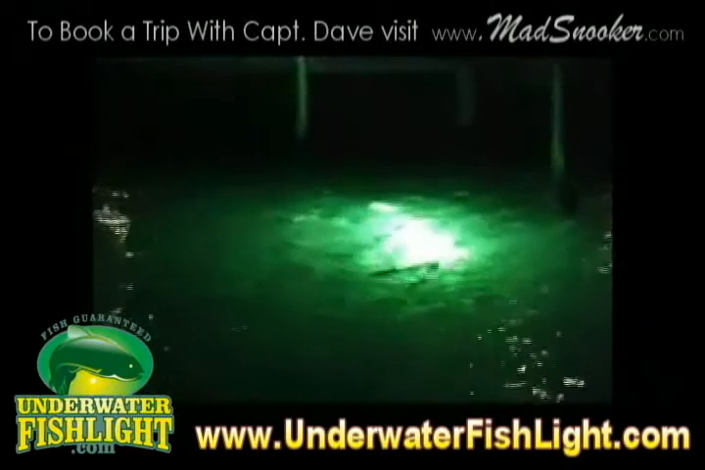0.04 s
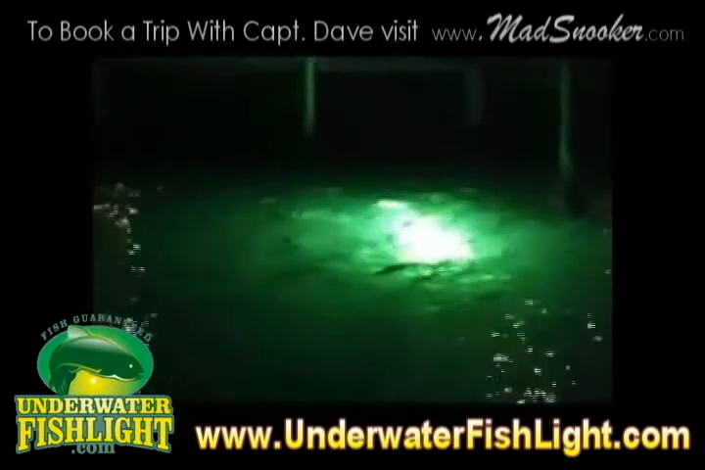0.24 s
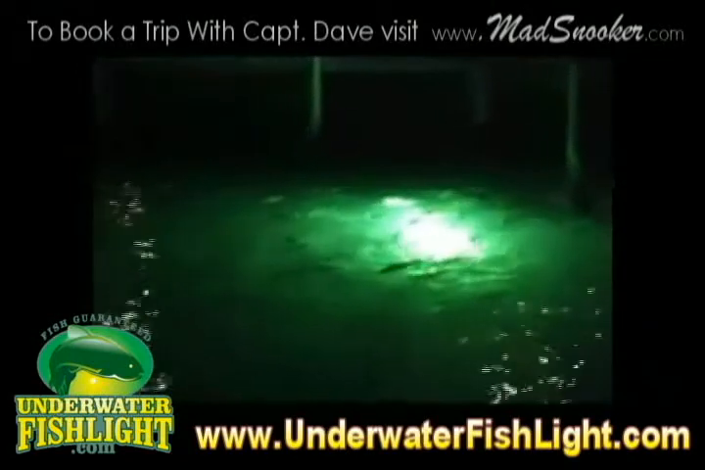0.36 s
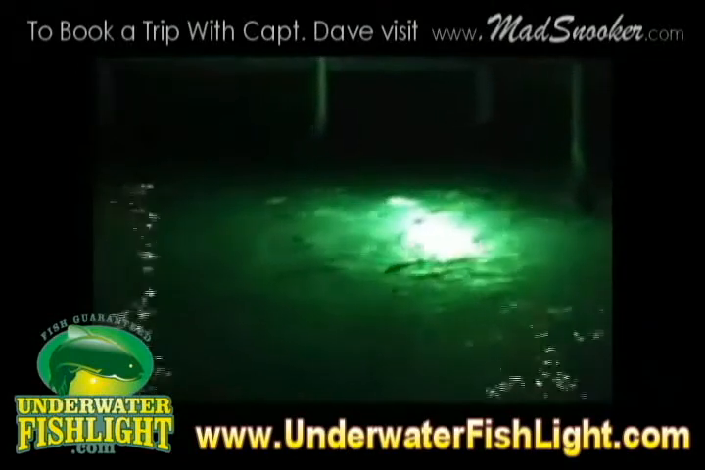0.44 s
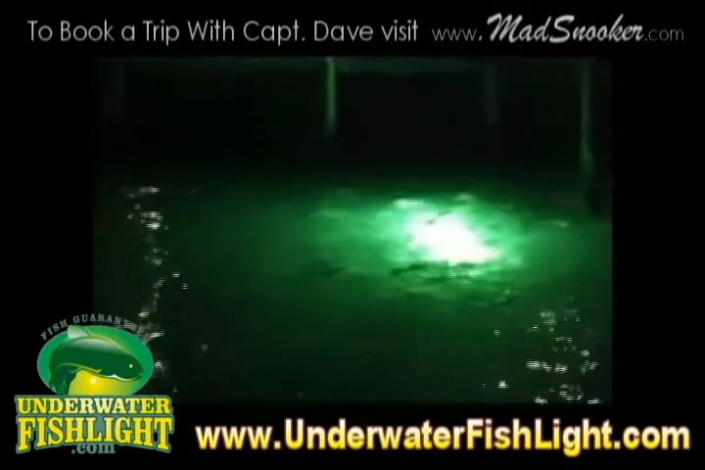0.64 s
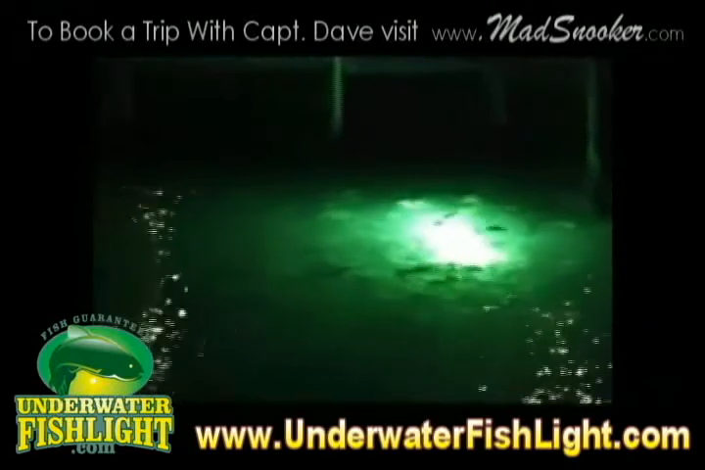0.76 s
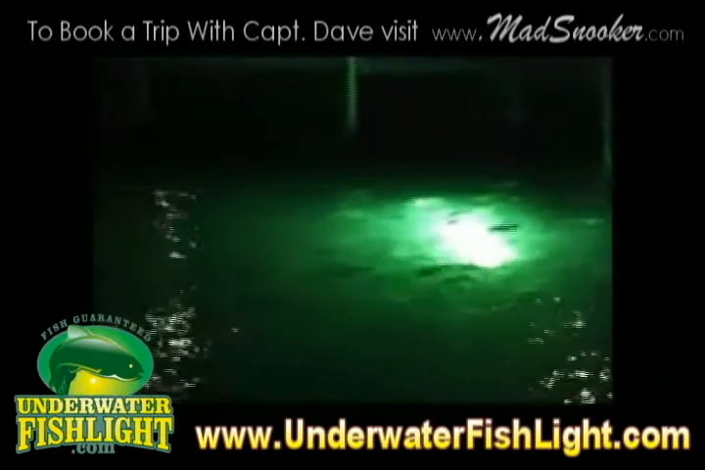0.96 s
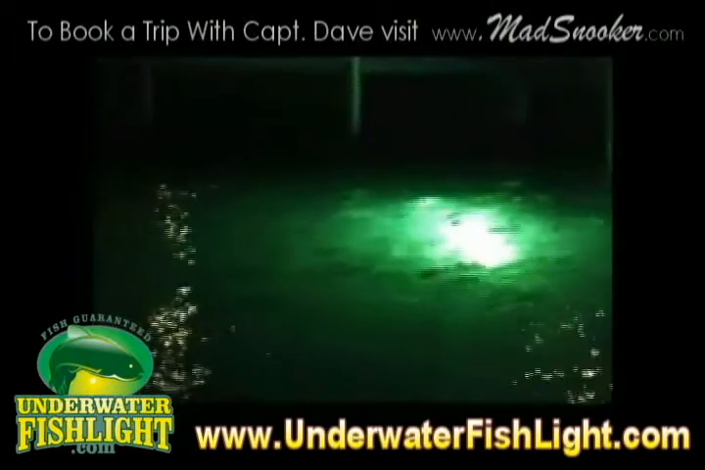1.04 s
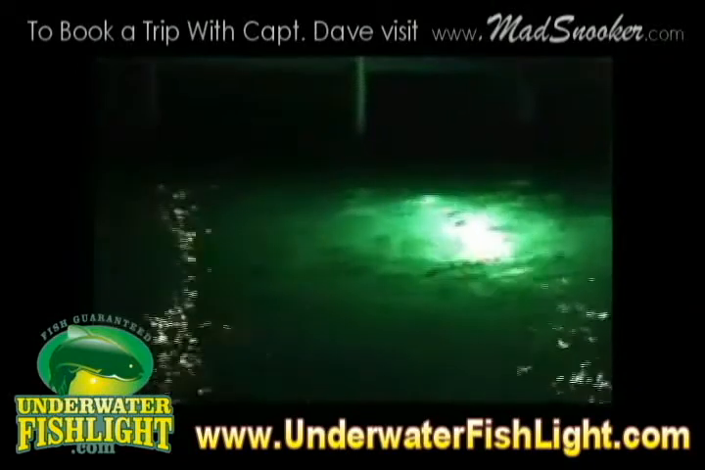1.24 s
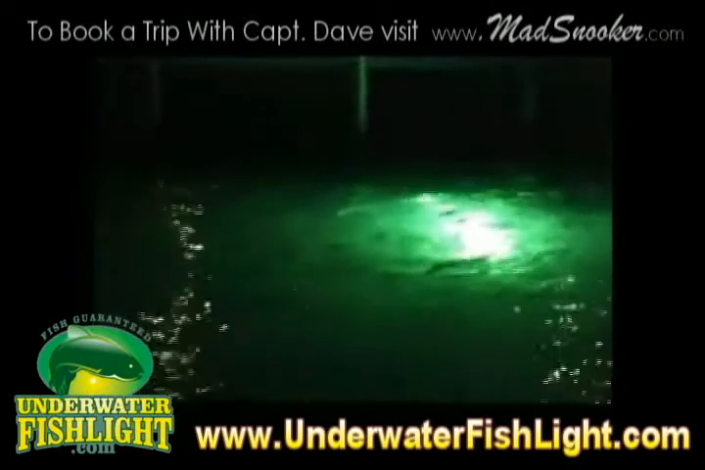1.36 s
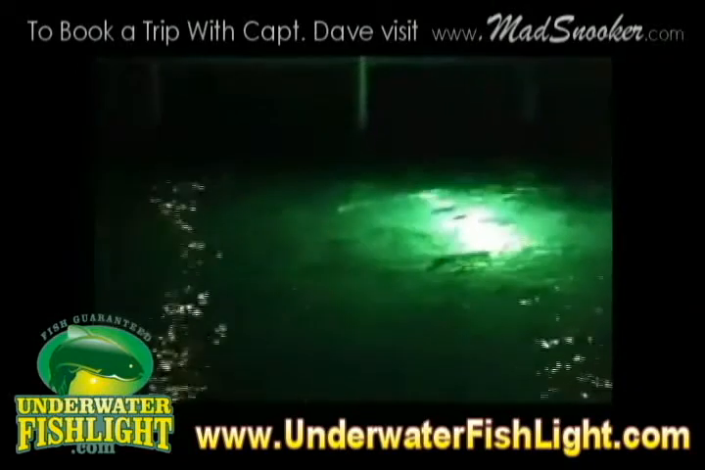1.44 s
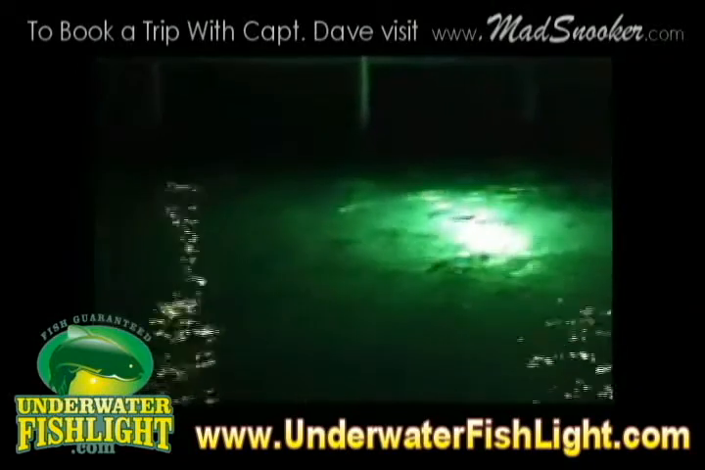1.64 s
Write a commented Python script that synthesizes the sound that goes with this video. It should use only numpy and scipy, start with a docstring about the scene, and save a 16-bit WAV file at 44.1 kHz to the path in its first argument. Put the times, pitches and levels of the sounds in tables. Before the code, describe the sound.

A hard object lands with a sharp double knock over gently lapping water.

```python
"""Two sharp knocks close by on a dock at night: a hard object lands and drops back.
Each blow cracks, rings the object's modes, chatters briefly and echoes off the dock.
Small waves lap and splash as clouds of droplet impacts; trapped air rings in a few plops.
Behind them: a soft wash of water, puffs of breeze and a thin, swelling insect-like buzz."""
import sys
import numpy as np
from scipy import signal
from scipy.fft import rfft, irfft
from scipy.io import wavfile
from scipy.ndimage import uniform_filter1d

SR = 44100
rng = np.random.default_rng(int(sys.argv[2]) if len(sys.argv) > 2 else 0)


def store_wav(level_fs):
    """Save 16-bit WAV to argv[1]."""
    pcm = np.round(np.clip(np.atleast_2d(level_fs), -1, 1) * 32767)
    wavfile.write(sys.argv[1], SR, pcm.T.astype(np.int16))


N = 74970

# knock onsets (time [s])
KNOCK_TIMES_S = [0.2125, 0.2674]
# per knock (ring [dB], chatter [dB], chatter hold [s], echo [dB], L-R [dB], crack [dB],
# contact time [s], snap [dB])
KNOCKS = [(0, -13, 0.0064, -32.5, -1.7, -4, 0.000045, -35),
          (0.5, -14.5, 0.011, -30.5, -0.5, -4.5, 0.00014, -54)]
WATER_PAN_DB = -1


def undb(db):
    """Decibels to gain."""
    return 10 ** (np.asarray(db) / 20)


def unit(x):
    """Scale to unit rms."""
    return x / (np.std(x) + 1e-12)


def curve(points, hz):
    """Interpolate (frequency [Hz], level [dB]) points over log frequency."""
    points_hz, db = np.array(points).T
    return np.interp(np.log(hz + 1), np.log(points_hz), db)


def colour(x, points):
    """Filter by a level curve; unit rms."""
    hz = np.arange(N // 2 + 1) * SR / N
    return unit(irfft(rfft(x) * undb(curve(points, hz)), N))


def band(x, hz, octaves):
    """Gaussian band-pass over log frequency; unit rms."""
    away = np.log2((np.arange(N // 2 + 1) * SR / N + 1) / hz) / octaves
    return unit(irfft(rfft(x) * np.exp(-.5 * away ** 2), N))


def noise():
    """White noise."""
    return rng.standard_normal(N)


def walk(rate_hz):
    """Smooth random drift; unit rms."""
    hold = max(int(SR / rate_hz), 1)
    steps = noise()[np.arange(N) // hold]
    return unit(uniform_filter1d(uniform_filter1d(steps, hold), hold))


def drops(per_s, scatter_db):
    """Random tiny impacts of uneven, bounded size."""
    hits = rng.random(N) < per_s / SR
    return hits * np.sign(noise()) * undb(scatter_db * np.clip(noise(), -2, 2))


def stereo(mid, side, pan_db):
    """Mid and side to left and right; pan is L-R."""
    return np.array([mid + side, mid - side]) * undb(np.array([[pan_db], [-pan_db]]) / 2)


def swell(t, rise_s, decay_s):
    """Gaussian rise to t = 0, then exponential decay."""
    return np.exp(-(np.minimum(t, 0) / rise_s) ** 2 - np.maximum(t, 0) / decay_s)


def wash(ripple_db=-43.5, trickle_db=-55, swell_db=1.94, flicker_db=0.87):
    """Ripples all around swell together and flicker band by band, with a light trickle."""
    # spectrum of water and breeze (frequency [Hz], level [dB])
    spectrum = [(30, -27.5), (100, -12.5), (200, -8.5), (360, -5.5), (600, -1), (1000, -4), (1550, -8.5),
                (2000, -10), (2900, -15), (5500, -12), (7800, -13), (10000, -25)]
    # stereo width (frequency [Hz], relative side level [dB])
    width = [(30, -23), (60, 12.5), (125, -1.5), (250, -3.5), (550, -6.5), (1200, -4), (4000, -11),
             (9000, 1.5)]
    centres_hz = np.geomspace(30, 12000, 18)
    surge = undb(swell_db * walk(rate_hz=4.2))
    mid, side = (sum(np.sqrt(hz) * band(noise(), hz, 0.32) * undb(flicker_db * walk(rate_hz=34.72))
                     for hz in centres_hz) for _ in range(2))
    side_spectrum = [(hz, curve(spectrum, hz) + curve(width, hz)) for hz in centres_hz]
    ripples = stereo(colour(mid, spectrum), undb(-6) * colour(side, side_spectrum), pan_db=-1.86)
    near, wide = (band(drops(per_s=900, scatter_db=11), hz=2080, octaves=1.04) for _ in range(2))
    trickle = stereo(near, 0.84 * wide, WATER_PAN_DB)
    return surge * (undb(ripple_db) * ripples + undb(trickle_db) * trickle)


def breeze(t):
    """Faint low puffs, independent left and right."""
    # puffs of air (time [s], rise [s], decay [s], level [dB], centre [Hz])
    puffs = [(0.05, 0.027, 0.09, -48.5, 70), (1.48, 0.039, 0.033, -54.5, 100)]
    return sum(undb(db) * swell(t - at, rise, decay) * np.array([band(noise(), hz, 1) for _ in range(2)])
               for at, rise, decay, db, hz in puffs)


def buzz(t, floor_db=-54, waver_db=3, side_db=-5):
    """A narrow, wavering high band swells a few times a second, like distant insects."""
    # buzz swells (time [s], half width [s], level [dB])
    swells = [(0.054, 0.04, -48.5), (0.313, 0.058, -49), (0.6, 0.1, -50.5), (0.89, 0.058, -50),
              (1.145, 0.064, -47.5), (1.308, 0.11, -57), (1.556, 0.047, -48)]
    level = undb(floor_db) + sum(undb(db) * np.exp(-((t - at) / half) ** 2) for at, half, db in swells)
    mid, side = (band(noise(), hz=6853, octaves=0.07) * undb(waver_db * walk(rate_hz=40.32))
                 for _ in range(2))
    return level * stereo(mid, undb(side_db) * side, pan_db=-4)


def bursts(t, events, per_s, octaves, spread=0.19):
    """Each break of the surface is a short cloud of droplet impacts."""
    out = 0
    for at, rise_s, decay_s, db, hz in events:
        mid, side = (band(drops(per_s, scatter_db=3.5), hz, octaves) for _ in range(2))
        out += undb(db) * swell(t - at, rise_s, decay_s) * stereo(mid, spread * side, WATER_PAN_DB)
    return out


def splashes(t):
    """Fine spray: dense, bright droplet clouds."""
    # spray bursts (time [s], rise [s], decay [s], level [dB], centre [Hz])
    sprays = [(0.36, 0.03, 0.045, -40.5, 3530), (0.545, 0.03, 0.02, -43, 4220),
              (0.6, 0.017, 0.12, -43, 3240), (0.667, 0.01, 0.0074, -42, 5260),
              (0.764, 0.0048, 0.03, -33, 4130), (0.77, 0.0016, 0.0012, -25, 3900),
              (0.803, 0.0025, 0.0047, -37.5, 4200), (0.965, 0.02, 0.013, -45, 3200),
              (1.086, 0.0035, 0.0056, -25.5, 4960), (1.096, 0.0076, 0.025, -36, 4150),
              (1.166, .002, 0.0079, -36, 3600), (1.215, 0.022, .028, -40.5, 3750),
              (1.338, 0.0031, 0.0047, -55, 4450), (1.565, 0.0042, 0.014, -40.5, 4520),
              (1.61, 0.0011, .003, -37, 2400)]
    return bursts(t, sprays, per_s=3600, octaves=0.89)


def laps(t):
    """Small waves slap: sparser, lower droplet clouds."""
    # wave slaps (time [s], rise [s], decay [s], level [dB], centre [Hz])
    slaps = [(0.09, 0.014, 0.036, -41, 417), (0.174, .0007, 0.024, -41, 1290),
             (0.484, 0.012, 0.028, -44, 654), (0.598, .003, 0.038, -39.5, 1700),
             (0.643, .004, 0.045, -42, 720), (0.836, 0.0067, 0.0062, -39, 800),
             (0.99, 0.017, 0.013, -53, 1130), (1.099, 0.017, 0.01, -39.5, 730),
             (1.151, .002, 0.021, -38.5, 1490), (1.175, .002, 0.026, -38.5, 665),
             (1.201, .003, 0.013, -38.5, 1020), (1.218, 0.0018, 0.019, -35, 726),
             (1.23, 0.029, 0.035, -48.5, 332), (1.266, 0.00054, 0.0076, -32, 890),
             (1.283, 0.0019, 0.0098, -33.5, 780), (1.336, 0.0046, 0.0028, -36, 784),
             (1.565, 0.0092, 0.018, -41.5, 775), (1.66, 0.09, 0.028, -46, 1080)]
    return bursts(t, slaps, per_s=1800, octaves=0.88)


def plops(t, rise_s=0.0005):
    """Pockets of trapped air ring for a few cycles, most gliding in pitch."""
    # air pockets (time [s], pitch [Hz], level [dB], decay [s], glide [octaves/s])
    pockets = [(0.752, 410, -32.5, 0.01, 7), (0.769, 465, -23.5, 0.0033, 4), (0.781, 478, -30, 0.011, 0),
               (0.8015, 1890, -24, 0.003, -68), (0.913, 1605, -37, .007, 4), (0.972, 1080, -30, 0.0034, 14),
               (0.989, 1530, -36, 0.0055, 13), (1.001, 1680, -31, 0.0025, 18),
               (1.092, 1900, -23.5, .005, 2), (1.174, 863, -32, 0.0048, -17),
               (1.266, 820, -21.5, 0.0034, 0), (1.289, 1660, -34, 0.0063, 12), (1.325, 429, -38, 0.02, 2.5),
               (1.46, 1565, -35.5, .011, 1), (1.564, 680, -32, 0.0055, 3), (1.67, 1170, -35, 0.0054, -6)]
    out = 0
    for at, hz, db, decay_s, glide in pockets:
        age = np.maximum(t - at, 0)
        cycles = np.cumsum((t > at) * hz * 2 ** np.clip(glide * age, -1, 1)) / SR
        envelope = (1 - np.exp(-age / rise_s)) * np.exp(-age / decay_s)
        out += undb(db) * envelope * np.sin(2 * np.pi * cycles)
    return stereo(out, 0, WATER_PAN_DB)


def snaps(t, decay_s=0.00047):
    """The first instant of each knock reaches the highest treble."""
    envelope = sum(undb(snap_db) * swell(t - at, decay_s / 2, decay_s)
                   for at, (*_, snap_db) in zip(KNOCK_TIMES_S, KNOCKS))
    return envelope * np.array([band(noise(), hz=13000, octaves=0.39) for _ in range(2)])


def dock_echo(t, pan_db, decay_s=0.035, spread=0.24):
    """Diffuse echo off the dock after a blow at t = 0."""
    # echo spectrum (frequency [Hz], level [dB])
    spectrum = [(100, -13), (400, -5.5), (900, -3.5), (2000, -4), (3600, -8), (7000, -13), (10000, -20)]
    envelope = (t > 0) * np.exp(-np.maximum(t, 0) / decay_s)
    return envelope * stereo(colour(noise(), spectrum), spread * colour(noise(), spectrum), pan_db)


def chatter(t, k, hold_s, pan_db, fall_s=0.0044, brush_s=0.0074, brush_db=-30, side_db=-9.5):
    """The contact of knock k brushes lightly before t = 0, then chatters."""
    # chatter spectrum per knock (frequency [Hz], level [dB])
    spectra = [
        [(59, -58), (100, -35), (841, -3.5), (1330, -11), (1500, -5), (2520, -25), (3360, -9.5), (4050, -6.5),
         (4880, -16), (6650, -14), (9850, -24), (10900, -25), (14000, -49)],
        [(59, -72), (100, -37), (254, -44), (774, 6.5), (1600, -1), (2090, -18), (2850, 4), (4780, -8.5),
         (5750, -1.5), (7850, -16), (10300, -13), (11400, -72), (14000, -87)],
    ]
    # stereo width (frequency [Hz], relative side level [dB])
    width = [(100, 10), (380, -6), (700, -32), (1300, -20), (3500, -11), (4600, -15), (6600, -23),
             (7600, -5), (9000, -1.5)]
    # chatter sag per knock (time constant [s])
    sag_s = [.04, .013]
    age = np.maximum(t, 0)
    brush = undb(brush_db) * (t > -brush_s) * (t <= 0)
    contact = (t > 0) * np.exp(-age / sag_s[k] - np.maximum(age - hold_s, 0) / fall_s)
    side = undb(side_db) * colour(colour(noise(), spectra[k]), width)
    return (brush + contact) * stereo(colour(noise(), spectra[k]), side, pan_db)


def body_ring(t, k):
    """Knock k rings the object's damped modes, alternating in sign."""
    # object modes (frequency [Hz], first knock [dB], second knock [dB], t60 [s])
    modes = [(325, -31, -46, .05), (590, -28, -19, .028), (700, -21, -22, .04), (835, -18, -17, .036),
             (1025, -16, -22, .04), (1210, -27, -13, .028), (1490, -21, -18, .028), (1620, -27, -19, .033),
             (2890, -26, -22, .04), (3360, -16, -24, .035), (3945, -19, -23, .04), (4135, -15, -31, .038),
             (5580, -25, -25, .04), (6430, -22, -33, .04), (6615, -23, -31, .04)]
    age = np.maximum(t, 0)
    return sum((-1) ** j * undb(db[k]) * np.sin(2 * np.pi * hz * age) * undb(-60 * age / t60_s)
               for j, (hz, *db, t60_s) in enumerate(modes))


def knocks(t, crack_lag_s=0.00027, low_cut_hz=270):
    """Each blow cracks and rings the body; the contact chatters and the dock echoes."""
    out = 0
    for k, at in enumerate(KNOCK_TIMES_S):
        ring_db, chatter_db, hold_s, echo_db, pan_db, crack_db, contact_s, _ = KNOCKS[k]
        push = (t - at - crack_lag_s) / contact_s
        crack = -undb(crack_db) * push * np.exp(.5 - .5 * push ** 2)
        out += stereo(crack + undb(ring_db) * body_ring(t - at, k), 0, pan_db)
        out += undb(chatter_db) * chatter(t - at, k, hold_s, pan_db)
        out += undb(echo_db) * dock_echo(t - at, pan_db)
    return signal.sosfilt(signal.butter(2, low_cut_hz, "high", fs=SR, output="sos"), out)


def scene(edge_hz=10400):
    """Knocks over water, breeze and buzz; only the snaps bypass the low-pass."""
    t = np.arange(N) / SR
    water = splashes(t) + laps(t) + plops(t)
    low_pass = signal.ellip(10, .2, 70, edge_hz, fs=SR, output="sos")
    return signal.sosfilt(low_pass, knocks(t) + water + wash() + breeze(t) + buzz(t)) + snaps(t)


def record(dry):
    """Clip the highest peaks, then cut the top treble."""
    peak_limit, top_hz = .85, 16400
    low_pass = signal.ellip(8, .2, 70, top_hz, fs=SR, output="sos")
    return signal.sosfilt(low_pass, np.clip(dry, -peak_limit, peak_limit))


dry = scene()
out = record(dry)
store_wav(out)
```